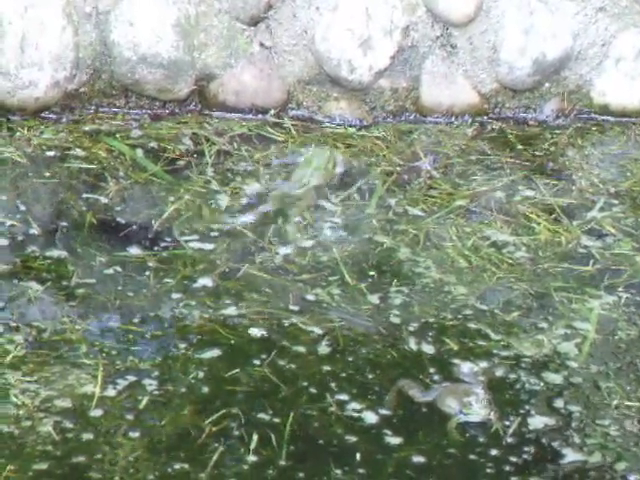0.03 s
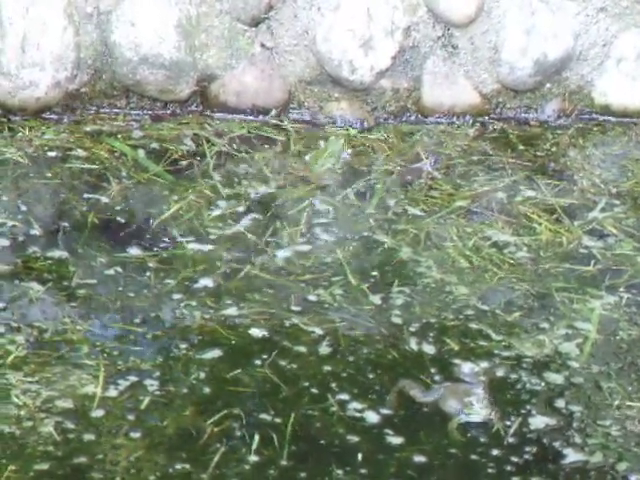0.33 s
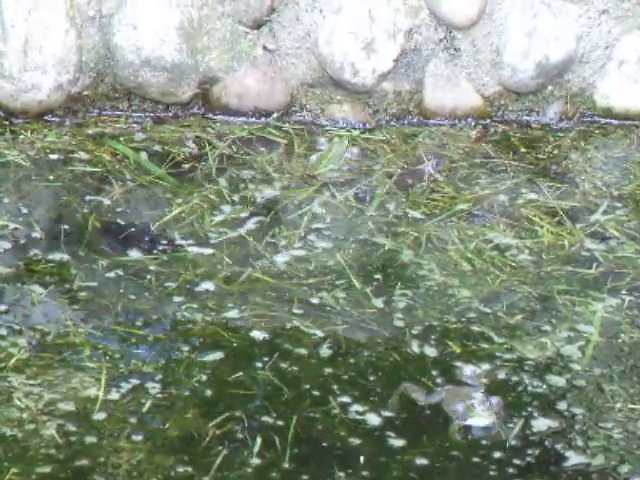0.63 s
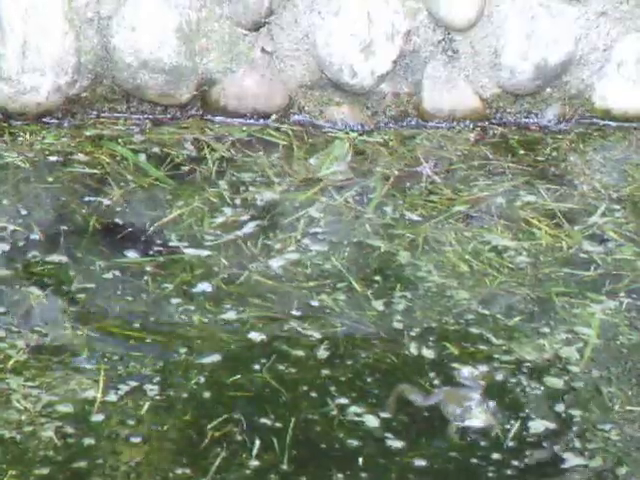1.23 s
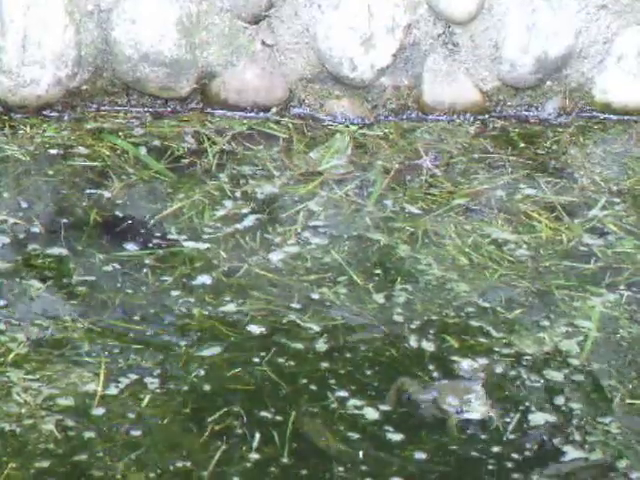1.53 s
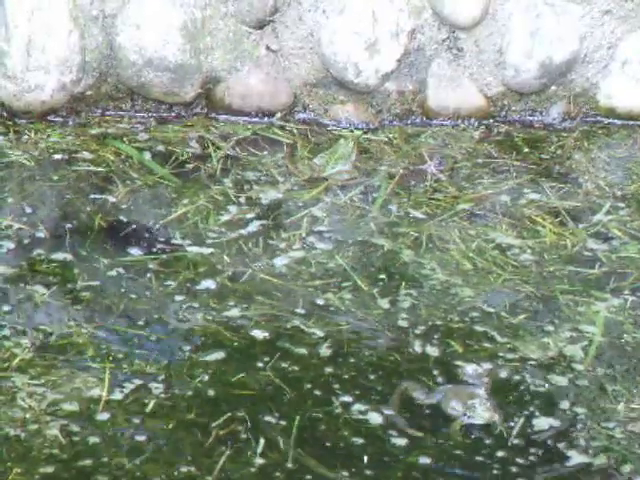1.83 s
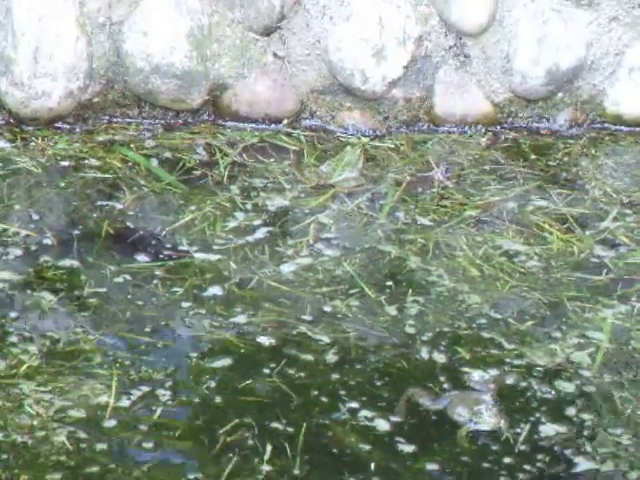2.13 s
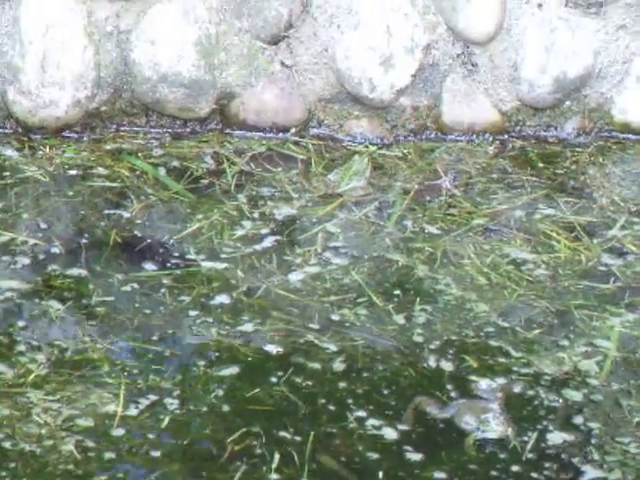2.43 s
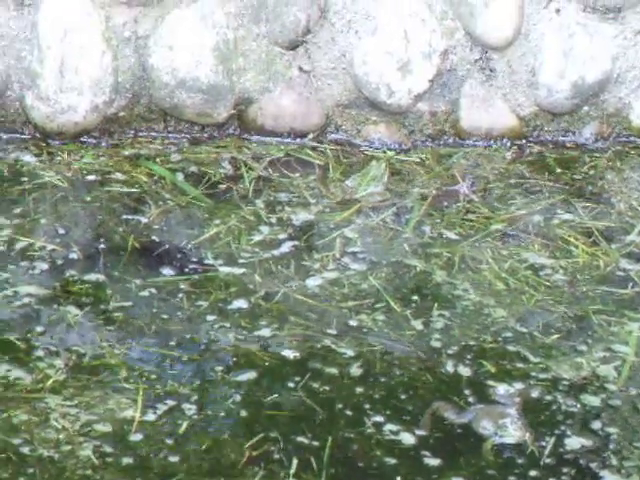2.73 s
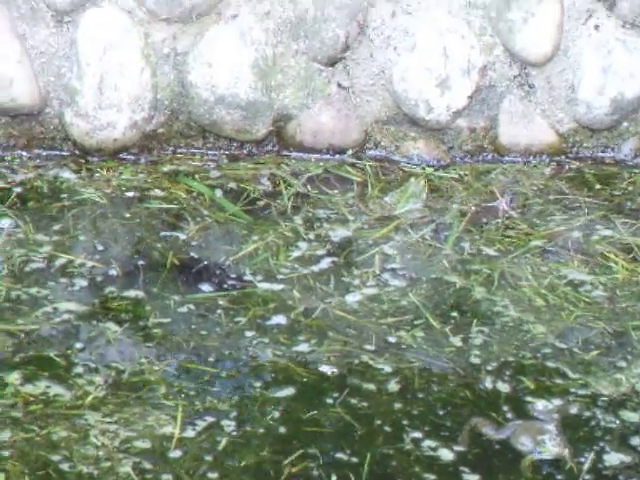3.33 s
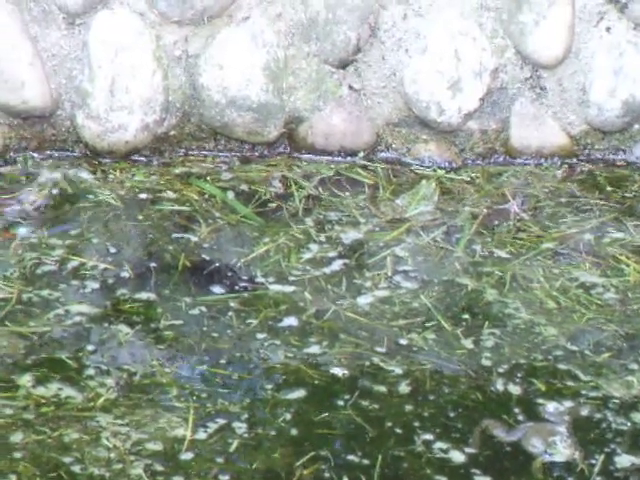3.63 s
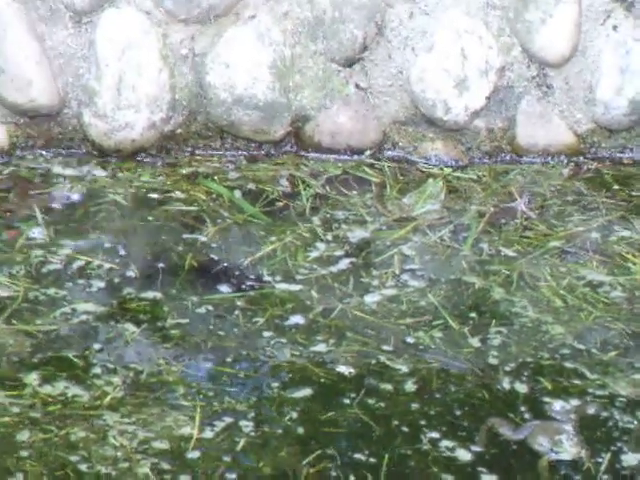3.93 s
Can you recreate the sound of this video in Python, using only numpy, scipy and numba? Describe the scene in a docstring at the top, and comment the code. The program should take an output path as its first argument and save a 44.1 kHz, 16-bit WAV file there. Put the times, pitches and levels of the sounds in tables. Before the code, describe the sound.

Frogs croak loudly at a garden pond over a steady, soft hush. Creaking groans fill the first 1.5 seconds, with a fast, bright rattle from 0.1 to 0.6. Low clucks and a second rattle come around 1.8 to 2.3, then a soft purr and another groan at 2.6. A third rattle starts at 3.1. A distant bird chirps faintly twice near 3.7 as a last groan begins.

```python
"""Water frogs call in a small stone-walled garden pond, over a steady outdoor hush.
Each call is a run of voice-box pulses that ring the throat and the air sacs of a frog. First comes a groan
that sinks in pitch, crackles and breaks into a creak; a fast rattle of short, bright notes joins at once.
More groans follow, with soft purrs between them. Midway come low clucks and a second rattle.
Near the end, after a third rattle, a far bird chirps twice as the last groan begins."""
import sys
import numpy as np
from scipy import signal
from scipy.fft import rfft, irfft
from scipy.io import wavfile
from scipy.ndimage import uniform_filter1d
from numba import njit

SR = 44100
rng = np.random.default_rng(int(sys.argv[2]) if len(sys.argv) > 2 else 0)


def dump_mix(stems):
    """Bounce the given channels to the path in sys.argv[1] as a 16-bit WAV at rate SR."""
    frames = np.atleast_2d(stems).T  # one column per channel
    limited = np.clip(frames, -1, 1)  # hard clip at full scale
    pcm = np.round(limited * 32767).astype(np.int16)
    wavfile.write(sys.argv[1], SR, pcm)


N = 176400
T = np.arange(N) / SR
SKIRT_RATIO = 0.48   # width of a ring's second filter compared with its first


def from_db(db):
    """Turn decibels into a gain."""
    return 10 ** (np.asarray(db) / 20)


def rms_one(x):
    """Scale a sound to an average power of one."""
    return x / np.sqrt(np.mean(x ** 2) + 1e-20)


def evened(x, size=500):
    """Even out the loudness: hold the power near one, smoothed over `size` samples."""
    power = np.abs(uniform_filter1d(uniform_filter1d(x * x, size), size))
    return x / np.sqrt(power + np.mean(x * x) / 100 + 1e-20)


def add(out, start_s, x):
    """Mix a sound in at its start time."""
    i = max(int(start_s * SR), 0)
    out[i:i + len(x)] += x[:max(N - i, 0)]


def along(rows, t):
    """Join a table's rows with straight lines and read each column at times t."""
    times, *columns = np.transpose(rows)
    return [np.interp(t, times, column) for column in columns]


def gains(spectrum, size):
    """Turn (frequency [Hz], level [dB]) rows into a gain for each frequency of an FFT."""
    hz, db = np.transpose(spectrum)
    return from_db(np.interp(np.log(np.fft.rfftfreq(size, 1 / SR) + 1), np.log(hz), db))


def coloured(x, spectrum, size=2048):
    """Give a sound a tone colour, with a filter that rings only after each click."""
    cepstrum = irfft(np.log(gains(spectrum, size)))
    folded = np.r_[cepstrum[0], 2 * cepstrum[1:size // 2]]
    response = irfft(np.exp(rfft(folded, size)))
    return signal.fftconvolve(x, response)[:len(x)]


def filtered(x, order, hz, kind):
    """Keep the lows, the highs or a band; a higher order cuts more steeply."""
    return signal.sosfilt(signal.butter(order, hz, kind, fs=SR, output="sos"), x)


def resonance(x, hz, width_hz):
    """Ring at one pitch; a narrower width rings longer."""
    r = np.exp(-np.pi * width_hz / SR)
    feedback = [1, -2 * r * np.cos(2 * np.pi * hz / SR), r * r]
    return signal.lfilter(np.array([1, 0, -1]) * (1 - r * r) / 2, feedback, x + 1e-18)


def ring(x, hz, width_hz):
    """Ring through two resonances in a row, at an even loudness."""
    return evened(resonance(resonance(x, hz, width_hz), hz, SKIRT_RATIO * width_hz))


@njit
def gliding(x, hz, width_hz):
    """Ring at a pitch that moves."""
    r, state, out = np.exp(-np.pi * width_hz / SR), 0j, np.zeros(len(x))
    for i in range(len(x)):
        state = state * r * np.exp(2j * np.pi * hz[i] / SR) + x[i]
        out[i] = 2 * (1 - r) * state.real
    return out


def pulses(rate_hz, rough):
    """Voice-box clicks; roughness (0-1) unsettles their spacing and strength and adds a rasp to each."""
    jitter, shimmer_db, rasp = 0.24, 6, 0.25   # at full roughness
    n = len(rate_hz)
    rough = np.clip(rough, 0, 1) * np.ones(n)
    chance, hiss = rng.standard_normal((400, 2)), rng.standard_normal(SR)[:n]
    cycle = (np.cumsum(rate_hz) / SR).astype(int)
    phase = np.cumsum(rate_hz * np.exp(jitter * rough * chance[cycle, 0])) / SR
    at = np.r_[0, np.flatnonzero(np.diff(np.floor(phase)))]   # one click per cycle
    late = np.clip((np.ceil(phase[at]) - phase[at]) / (phase[at + 1] - phase[at]), 0, 1)
    strength = from_db(shimmer_db * rough[at] * chance[:len(at), 1])
    out = np.zeros(n)
    out[at] += strength * (1 - late)   # each click is shared between two samples
    out[at + 1] += strength * late
    return out + rasp * rough * hiss * (1 - phase % 1) ** 2


def air():
    """A steady outdoor hush: noise that is strongest in the bass."""
    # tone colour of the hush: (frequency [Hz], relative level [dB])
    colour = [(20, -34.5), (55, 5.5), (72, -4), (250, -6.5), (1600, -8), (4000, -12), (7000, -11),
              (8500, -28)]
    hush = irfft(rfft(rng.standard_normal(N)) * gains(colour, N), N)
    return from_db(-49.5) * rms_one(hush)


def groans():
    """One run of pulses rings the gliding air sac, the low throat and faint overtones."""
    # voice of each groan: (time [s], pulse rate [Hz], sac pitch [Hz], roughness [0-1])
    voices = [
        [(0, 444, 1380, 0), (.022, 424, 1450, 0.36), (.04, 252.3, 1180, 0.05), (.085, 134, 1110, 0.7)],
        [(.1, 135.3, 1230, 0.09), (.125, 253.7, 1210, 0.54), (.155, 251.4, 1330, 0.42),
         (.175, 236.6, 1424, 0.14), (.195, 166, 1420, 0.26)],
        [(.46, 364.8, 1220, 0.28), (.5, 408.6, 1350, 0.24), (.56, 445, 1604, 0.04), (.595, 422.9, 1520, 0.08),
         (.62, 403.5, 1330, 0.1), (.645, 366.4, 1460, 0.12), (.665, 289.5, 1320, 0.39), (.71, 216.4, 1484, 0.3),
         (.77, 176.1, 1660, 0.38), (.81, 130.2, 1770, 0.61)],
        [(.92, 369.3, 1180, 0.29), (.975, 340.4, 1410, 0.01), (1.0, 334, 1340, 0.25), (1.025, 265, 1760, 0.63),
         (1.055, 173.5, 1800, 0.03)],
        [(1.11, 291.6, 1155, 0.11), (1.16, 250.1, 1240, 0.51), (1.19, 398.8, 1200, 0.36),
         (1.225, 412.5, 1320, 0.18), (1.27, 388.7, 1560, 0.2), (1.302, 358, 1720, 0.14),
         (1.33, 303.6, 1390, 0.2), (1.35, 256.6, 1296, 0.2), (1.385, 188.1, 1426, 0.37),
         (1.42, 173.5, 1523, 0.37), (1.47, 151.8, 1653, 0.5)],
        [(2.27, 289.7, 1930, 0.49), (2.305, 205, 1700, 0.48)],
        [(2.595, 292.1, 1590, 0.13), (2.645, 337.2, 2284, 0.05), (2.692, 352.5, 2350, 0.04),
         (2.715, 316.8, 1750, 0), (2.745, 286.1, 1500, 0.34), (2.79, 247, 1444, 0.28), (2.835, 210, 1673, 0.46),
         (2.875, 169.3, 1480, 0.47)],
        [(3.55, 326.6, 1320, 0.19), (3.575, 261.4, 1760, 0.66), (3.61, 228.4, 1970, 0.5)],
        [(3.69, 457.3, 1040, 0), (3.802, 565.5, 1300, 0), (3.83, 522.5, 1060, 0.06), (3.86, 475, 890, 0),
         (3.885, 459.6, 970, 0.2), (3.908, 232, 960, 0.27), (3.924, 227.4, 1300, 0.45),
         (3.96, 226.4, 1440, 0.55), (4, 148.5, 1370, 0.83)],
    ]
    # loudness of each groan: (time [s], sac level [dB], throat level [dB])
    loudness = [
        [(0, -28.5, -33), (.022, -39, -57.5), (.026, -26, -44.5), (.055, -33.5, -34), (.09, -44, -69)],
        [(.1, -30.5, -39), (.119, -36, -46), (.126, -20.5, -49), (.155, -19.5, -24), (.17, -20, -50),
         (.195, -43, -48)],
        [(.46, -36.5, -49), (.5, -26.5, -53), (.54, -22.5, -44), (.565, -23.5, -41), (.595, -20.5, -39.5),
         (.62, -21, -36), (.66, -18, -30.5), (.715, -17, -39), (.735, -28.5, -39), (.76, -16.5, -31.5),
         (.8, -28, -36), (.818, -55, -37)],
        [(.92, -46.5, -50.5), (.968, -42, -58), (.977, -34.5, -47.5), (1.005, -35, -45), (1.035, -30.5, -48.5),
         (1.058, -56, -53)],
        [(1.112, -44, -42.5), (1.116, -29, -37), (1.155, -24, -33.5), (1.183, -31, -41.5), (1.19, -17, -34),
         (1.2, -25.5, -37), (1.24, -21.5, -36.5), (1.283, -26, -30.5), (1.3, -17, -38), (1.345, -18, -36.5),
         (1.42, -18, -39), (1.437, -21.5, -40.5), (1.452, -17, -34), (1.461, -34.5, -22.5), (1.467, -13, -38.5),
         (1.476, -44, -49)],
        [(2.255, -30.5, -59), (2.28, -32.5, -30.5), (2.31, -41, -44)],
        [(2.595, -53, -72), (2.615, -43, -55), (2.66, -32, -51), (2.695, -29.5, -60), (2.748, -24, -41),
         (2.762, -22.5, -37.5), (2.772, -26.5, -43), (2.792, -20, -44), (2.803, -27, -55.5),
         (2.818, -27.5, -41), (2.824, -18, -47), (2.838, -25, -37.5), (2.88, -44.5, -52)],
        [(3.55, -32, -68), (3.57, -33, -46), (3.597, -32.5, -45.5), (3.615, -43, -43)],
        [(3.69, -61, -58), (3.76, -47, -45.5), (3.815, -39.5, -38), (3.85, -36.5, -34.5), (3.88, -32, -20.5),
         (3.891, -30, -46), (3.912, -25.5, -26), (3.935, -23.5, -48), (3.947, -21, -22.5), (3.963, -30, -34),
         (4, -44, -59)],
    ]
    # rings of each groan, with levels relative to the sac:
    # (top pitch when loudest [Hz], top level when loudest [dB], overtone level [dB], sac width [Hz])
    rings = [(4650, -24, -13.5, 150), (4460, -23.5, -10.5, 103), (4460, -24, -20, 143),
             (4160, -13, -9.5, 160), (4630, -23, -20.5, 160), (4790, -10.5, -24, 1300),
             (5460, -18, -8.5, 73), (5110, -13.5, -12, 2800), (4240, -18, -15.5, 184)]
    # tone colour of the overtones: (frequency [Hz], relative level [dB])
    colour = [(450, -28.5), (780, -1.5), (1700, -17.5), (2500, 13.5), (3000, 1.5), (3450, -0.5),
              (3900, -10), (6500, -18)]
    mouth_ratio, mouth_db = 0.71, -10   # the mouth rings below the sac and moves with it
    top_hz_per_db, top_width_hz = 46.5, 230   # the top ring rises with effort
    overtone_db_per_hz = 0.0205   # the overtones grow while the sac rings high
    throat_low_hz, throat_high_hz, skirt_hz = 376.4, 597, 1190
    out = np.zeros(N)
    for voice, levels, (top_hz, top_db, overtone_db, width_hz) in zip(voices, loudness, rings):
        t = np.arange(levels[0][0], levels[-1][0], 1 / SR)
        rate_hz, sac_hz, rough = along(voice, t)
        sac_db, throat_db = along(levels, t)
        clicks = pulses(rate_hz, rough)

        mouth = from_db(mouth_db) * gliding(clicks, mouth_ratio * sac_hz, width_hz=213)
        sac = gliding(clicks, sac_hz, width_hz) - mouth
        sac = gliding(gliding(sac, sac_hz, skirt_hz), sac_hz, 2 * skirt_hz)   # soften far-off pitches
        sac = evened(filtered(sac, 2, throat_high_hz, "high"))

        effort_db = sac_db - sac_db.max()
        high_hz = top_hz + top_hz_per_db * effort_db
        top = gliding(gliding(clicks, high_hz, top_width_hz), high_hz, SKIRT_RATIO * top_width_hz)
        top = from_db(top_db + effort_db / 2) * evened(top)
        lift_db = overtone_db_per_hz * (sac_hz - sac_hz.mean())
        overtones = from_db(overtone_db + lift_db) * evened(coloured(clicks, colour))

        throat = evened(filtered(clicks, 3, [throat_low_hz, throat_high_hz], "band"))
        hollow = from_db(-6) * ring(clicks, hz=648, width_hz=430)   # the throat's second ring
        add(out, t[0], from_db(sac_db) * (sac + top + overtones) + from_db(throat_db) * (throat + hollow))
    return out


def crackles():
    """As a groan catches or breaks, a few very rough, bright pulses escape and die at once."""
    # crackles: (time [s], level [dB])
    bursts = [(.024, -37), (1.114, -36.5), (1.147, -35), (3.941, -36)]
    rate_hz, decay_s = 600, 0.0053
    out, t = np.zeros(N), T[:SR // 20]
    for start_s, db in bursts:
        clicks = pulses(np.full(len(t), rate_hz), rough=0.97)
        add(out, start_s, from_db(db) * np.exp(-t / decay_s) * ring(clicks, hz=2540, width_hz=3000))
    return out


def rattles():
    """Each note is a short run of slowing pulses through the frog's body; the sac swells just after."""
    # notes of each rattle: (time [s], length [s], relative level [dB], sac pitch at mid-note [Hz])
    runs = [
        [(.119, 0.035, -18, 2450), (.2, 0.031, -14, 2550), (.281, .031, -13.5, 2574), (.363, 0.029, -13, 2574),
         (.442, 0.03, -13, 2520), (.517, 0.025, -13, 2550), (.59, 0.015, -16, 2470)],
        [(1.834, 0.039, -16, 2480), (1.914, .035, -15, 2600), (1.998, 0.031, -14, 2455),
         (2.075, 0.025, -13, 2434), (2.155, 0.03, -14, 2390), (2.226, 0.027, -14.5, 2340)],
        [(3.11, 0.033, -18, 2460), (3.173, 0.029, -16, 2475), (3.243, .029, -13.5, 2430),
         (3.315, 0.034, -14.5, 2450), (3.394, .032, -18, 2260), (3.468, 0.034, -17.5, 2330),
         (3.539, 0.033, -18.5, 2270)],
    ]
    # rings of each rattle, with levels relative to the sac:
    # (upper pitch [Hz], upper level [dB], body level [dB], sac width [Hz])
    rings = [(5023, -9.5, -10.5, 180), (5064, -12.5, -8, 79), (4836, -12.5, -13.5, 270)]
    # tone colour of the frog's body: (frequency [Hz], relative level [dB])
    colour = [(250, -23.5), (460, -1.5), (700, -10), (1000, -0.5), (1400, 1), (1800, -10), (2150, -3.5),
              (2450, -1), (3050, 2.5), (3550, -1), (4300, -10.5), (5600, -10.5), (7500, -24)]
    sac_rise_s, body_rise_s, release_s, gain_db = 0.007, 0.0042, 0.01, -8
    start_hz, end_hz, sag_s = 511.6, 231.2, 0.025   # the pulse rate sags within each note
    start_rough, added_rough = 0.222, 0.27
    bend_hz, upper_follows = 193, 0.64   # the sac rings lower as it fills; the upper ring follows
    out = np.zeros(N)
    for notes, (upper_hz, upper_db, body_db, width_hz) in zip(runs, rings):
        usual_hz = np.mean([note[-1] for note in notes])
        for start_s, length, db, middle_hz in notes:
            t = T[:int((length + release_s) * SR)]
            sag = 1 - np.exp(-(t / sag_s) ** 3)
            clicks = pulses(start_hz + (end_hz - start_hz) * sag, start_rough + added_rough * sag)
            body = coloured(clicks, colour)
            sac_hz = middle_hz + bend_hz * (.5 - t / length)
            sac = evened(gliding(body, sac_hz, width_hz))
            upper = evened(gliding(body, upper_hz + upper_follows * (sac_hz - usual_hz), width_hz=84))
            edge = from_db(body_db) * evened(body) + from_db(upper_db) * upper
            note = np.clip(t / sac_rise_s, 0, 1) ** 2 * sac + np.clip(t / body_rise_s, 0, 1) * edge
            fade = np.clip((length - t) / release_s + .5, 0, 1)
            add(out, start_s, from_db(db + gain_db) * fade * note)
    return out


def purrs():
    """Slow, uneven pulses ring the sacs and fade away."""
    # soft purrs: (time [s], length [s], starting level [dB], total fade [dB], sac pitch [Hz])
    calls = [(0.807, 0.14, -40.5, 23, 1440), (1.474, 0.19, -58, 25, 1530), (2.028, .47, -45, 2, 1240),
             (2.878, 0.35, -46.5, 9, 1670)]
    rate_hz, width_hz = 63, 220
    out = np.zeros(N)
    for start_s, length, db, fade_db, hz in calls:
        t = T[:int(length * SR)]
        clicks = pulses(np.full(len(t), rate_hz), rough=0.74)
        purr = resonance(resonance(clicks, hz, width_hz), hz, 2 * width_hz)
        add(out, start_s, evened(purr, size=2000) * from_db(db - fade_db * t / length))
    return out


def clucks():
    """Single pulses ring a throat for a few cycles."""
    # low clucks: (time [s], peak level [dB])
    calls = [(1.766, -35.5), (1.82, -38), (1.911, -32.5), (1.974, -36), (2.062, -35.5)]
    throat_hz, rise_s = 438, 0.0023
    out, t = np.zeros(N), T[:SR // 20]
    swell = t / rise_s * np.exp(1 - t / rise_s)
    for start_s, db in calls:
        add(out, start_s, from_db(db) * swell * np.sin(2 * np.pi * throat_hz * t))
    return out


def bird():
    """A far bird gives faint, falling whistles."""
    # whistles: (time [s], length [s], start pitch [Hz], end pitch [Hz], peak level [dB])
    chirps = [(3.634, 0.06, 4570, 3660, -47), (3.687, 0.059, 3540, 3050, -41.5)]
    out = np.zeros(N)
    for start_s, length, start_hz, end_hz, db in chirps:
        hz = np.linspace(start_hz, end_hz, int(length * SR))
        whistle = np.sin(2 * np.pi * np.cumsum(hz) / SR)
        add(out, start_s, from_db(db) * np.hanning(len(hz)) * whistle)
    return out


def pond(x):
    """Sound arrives directly, scatters off the stones, echoes off the wall and lingers in the garden."""
    # echo from the pond wall: (delay [s], level [dB])
    echoes = [(0.03, -19.5)]
    stones, garden = (0.14, -3), (0.77, -12.5)   # (time to fade by 60 dB [s], level [dB])
    response = np.zeros(SR)
    for fade_s, db in (stones, garden):
        tail = rng.standard_normal(SR) * from_db(-60 * T[:SR] / fade_s)
        response += from_db(db) * rms_one(tail) / np.sqrt(SR)
    response[0] += 1   # the direct sound
    for delay_s, db in echoes:
        response[int(delay_s * SR)] += from_db(db)
    return signal.fftconvolve(x, response)[:N]


def scene():
    """All the callers ring out around the pond, over the hush, in one channel."""
    loud_calls = filtered(rattles() + groans() + crackles(), order=4, hz=6240, kind="low")
    return (pond(loud_calls + purrs() + clucks() + bird()) + air())[None]


def record(dry):
    """Cut the highest treble steeply."""
    cutoff_hz = 8500
    return signal.sosfilt(signal.ellip(10, .3, 80, cutoff_hz, fs=SR, output="sos"), dry)


dry = scene()
out = record(dry)
dump_mix(out)
```